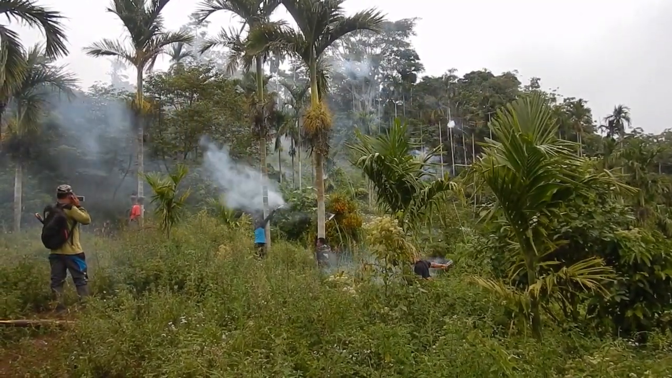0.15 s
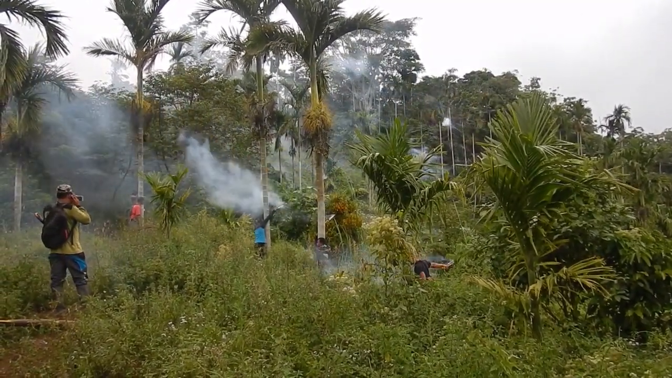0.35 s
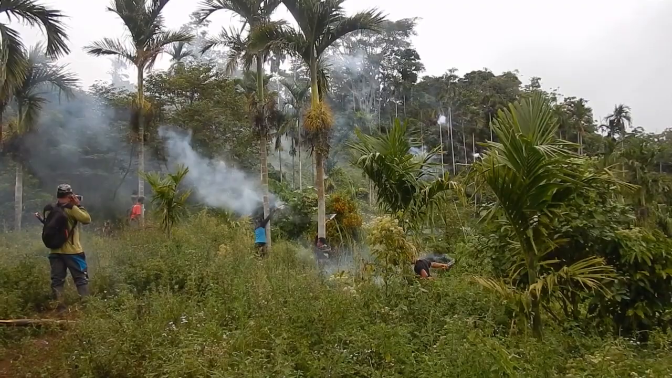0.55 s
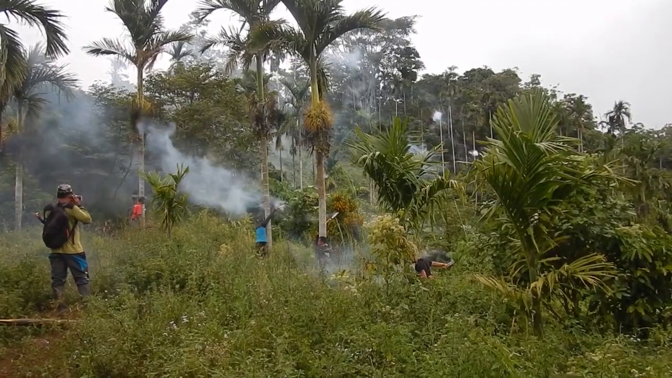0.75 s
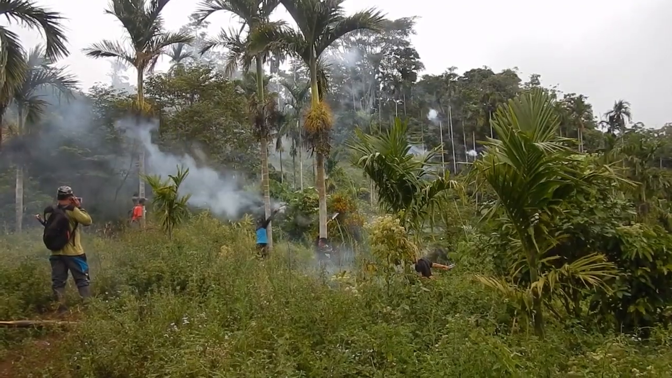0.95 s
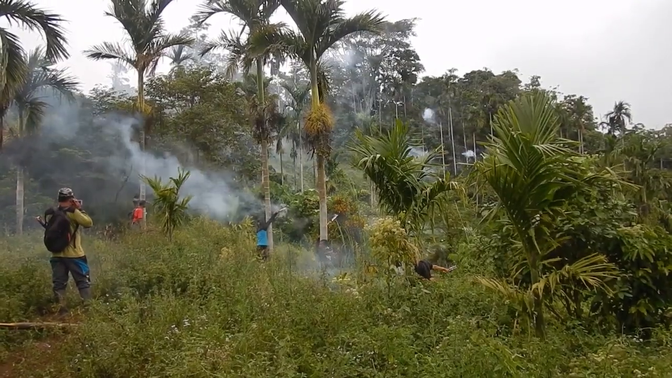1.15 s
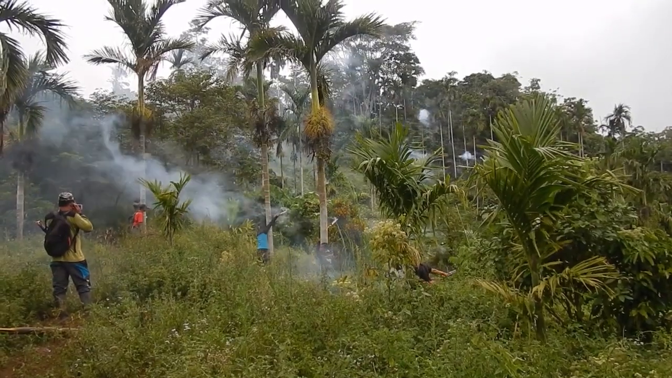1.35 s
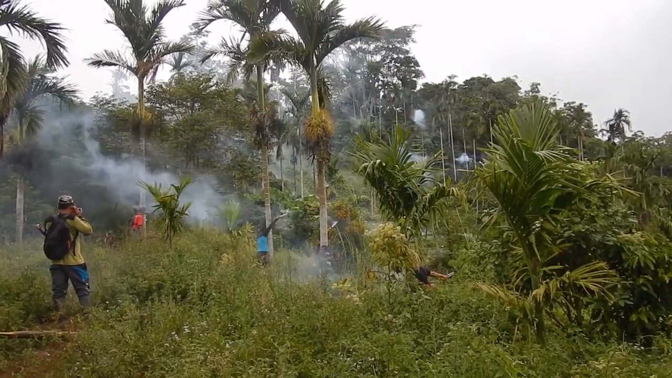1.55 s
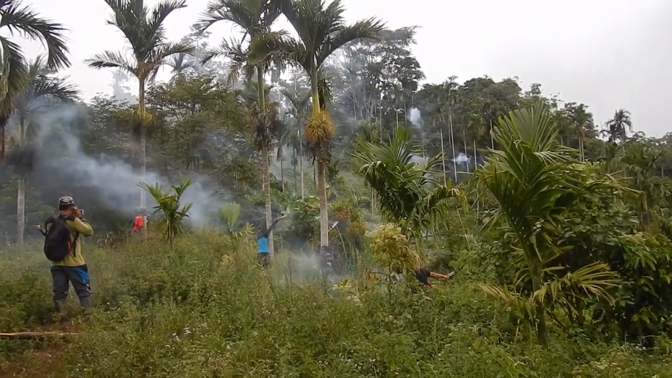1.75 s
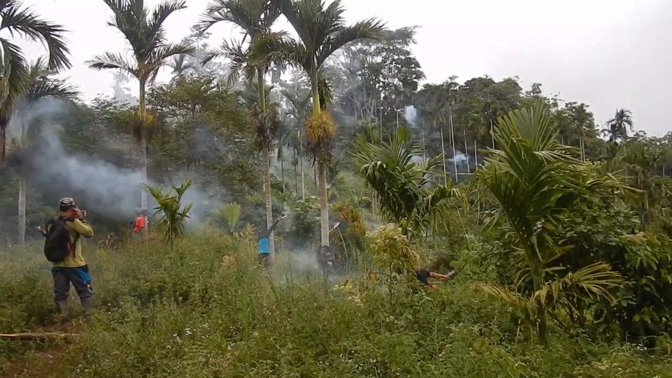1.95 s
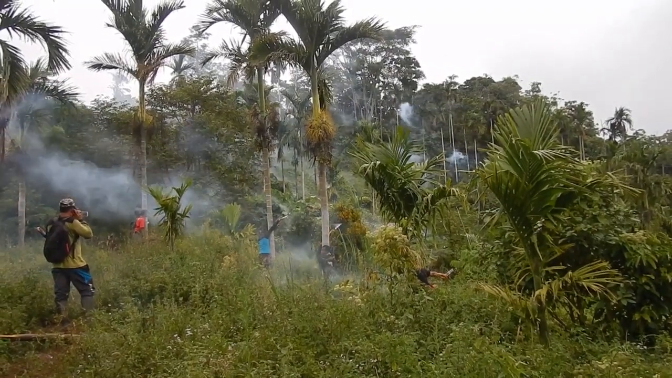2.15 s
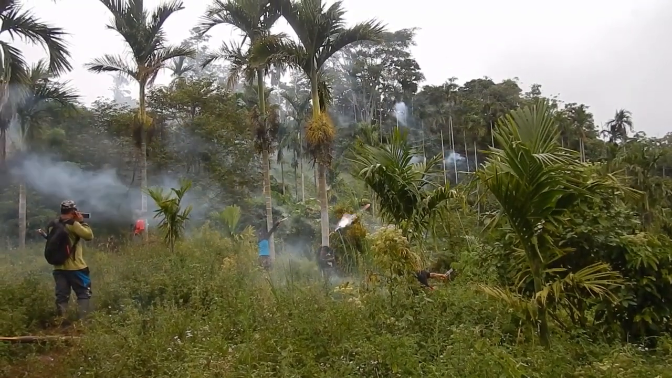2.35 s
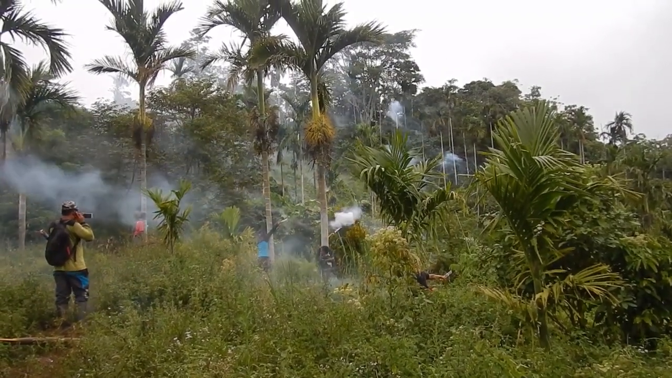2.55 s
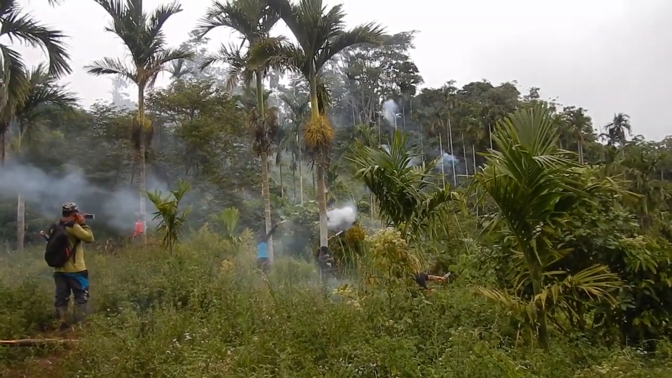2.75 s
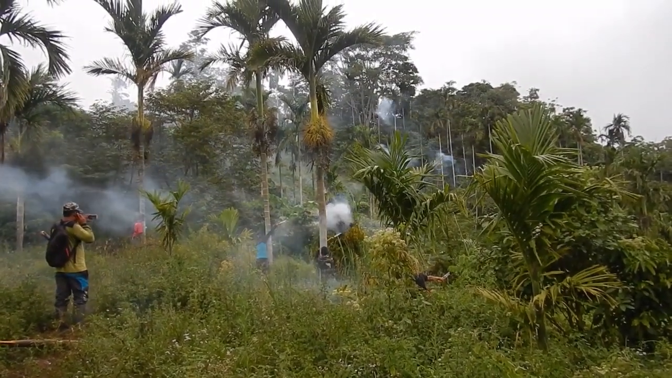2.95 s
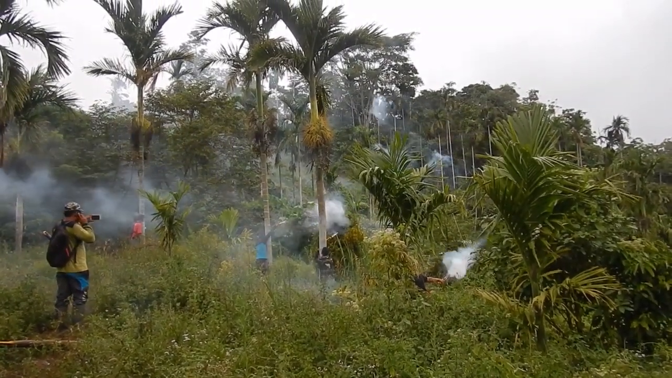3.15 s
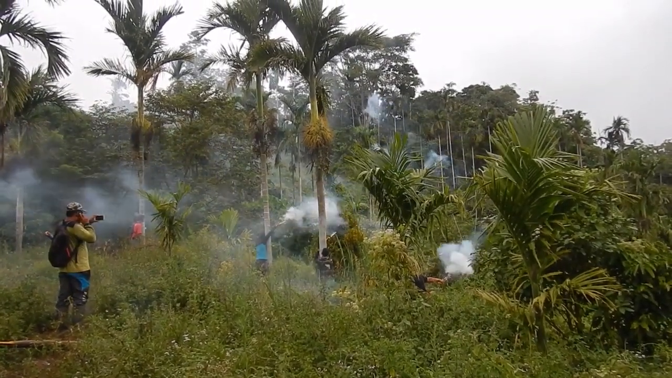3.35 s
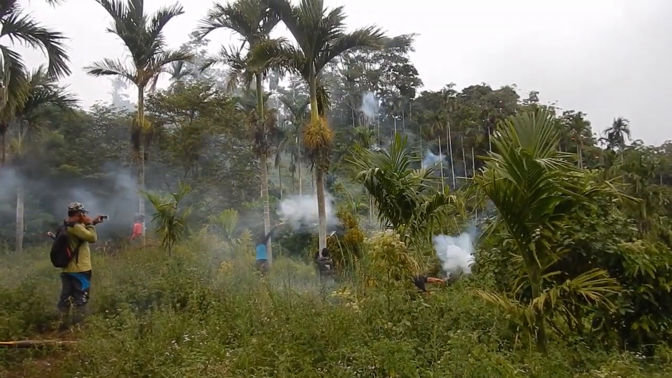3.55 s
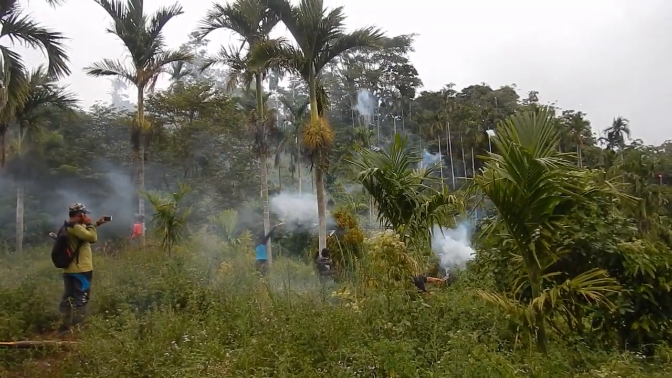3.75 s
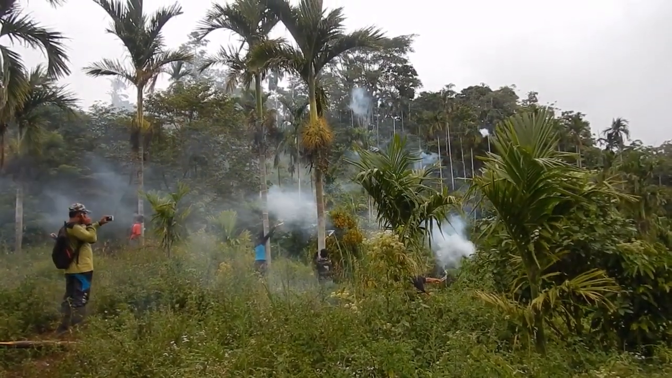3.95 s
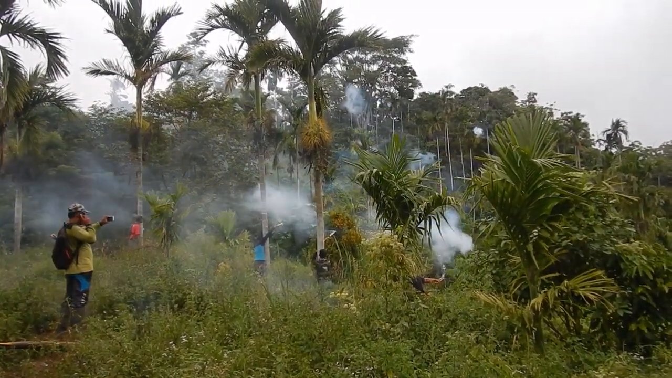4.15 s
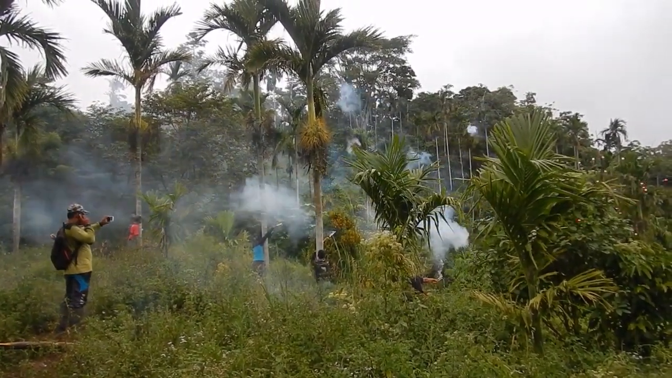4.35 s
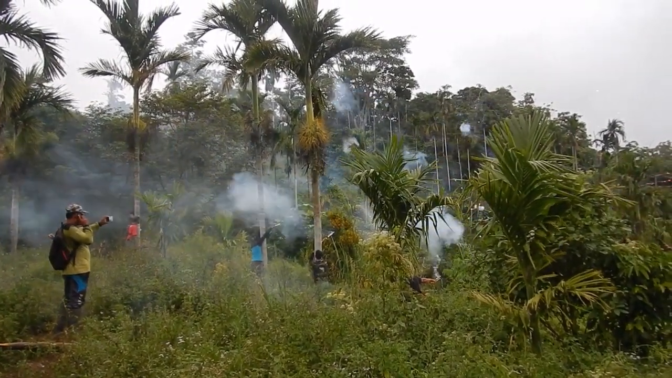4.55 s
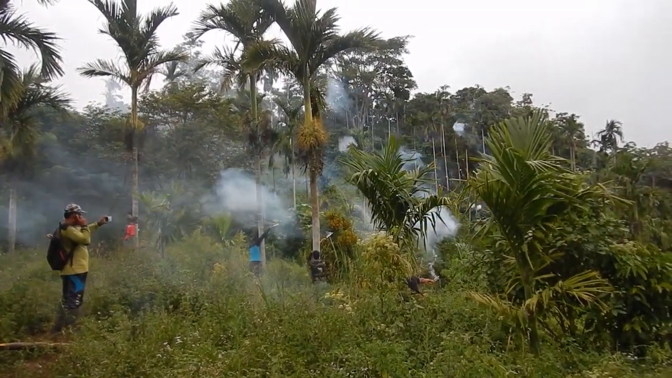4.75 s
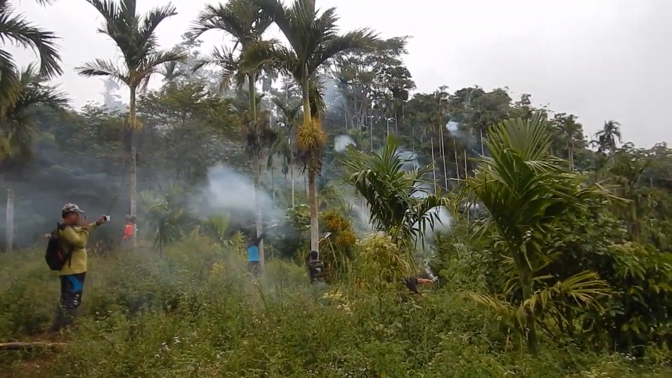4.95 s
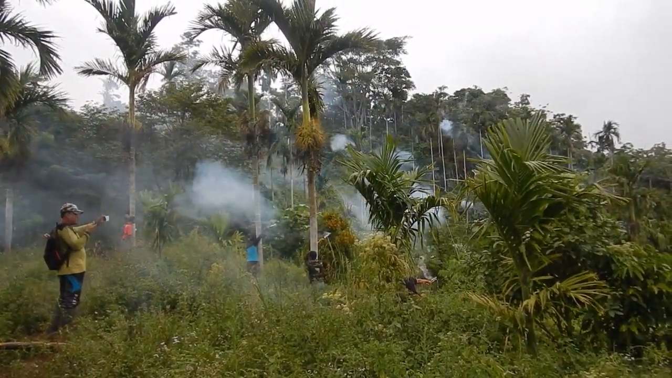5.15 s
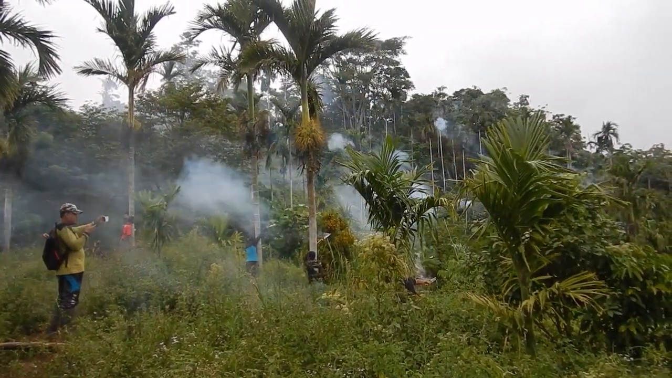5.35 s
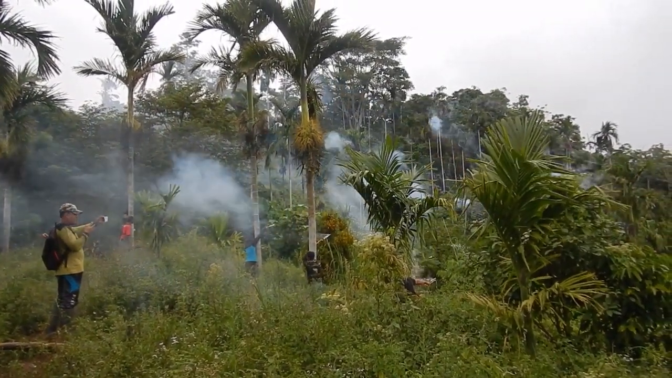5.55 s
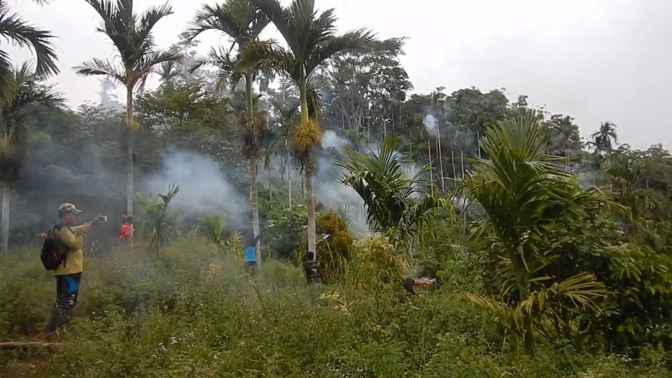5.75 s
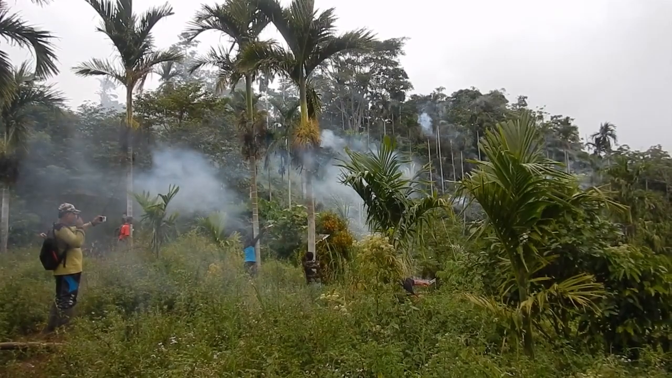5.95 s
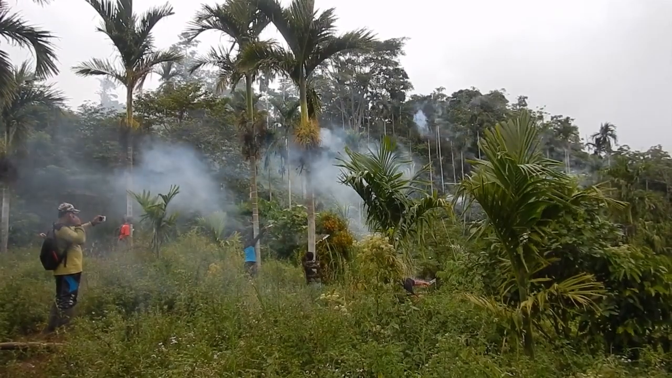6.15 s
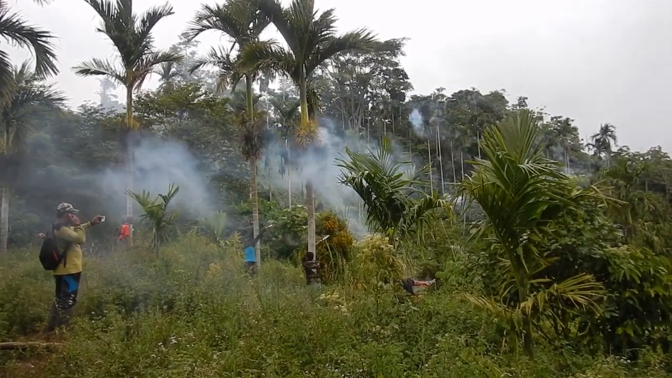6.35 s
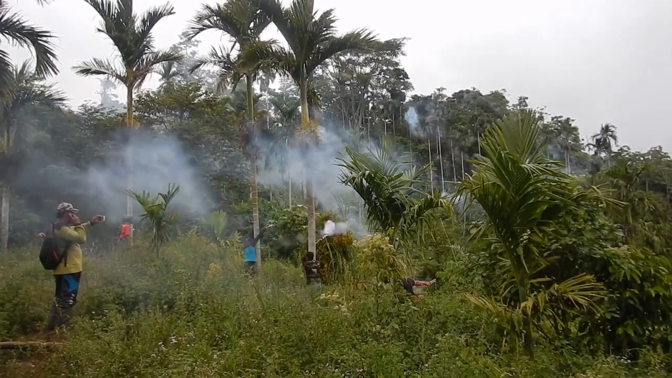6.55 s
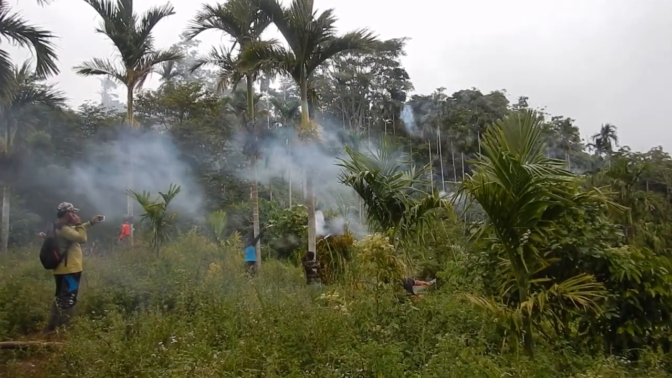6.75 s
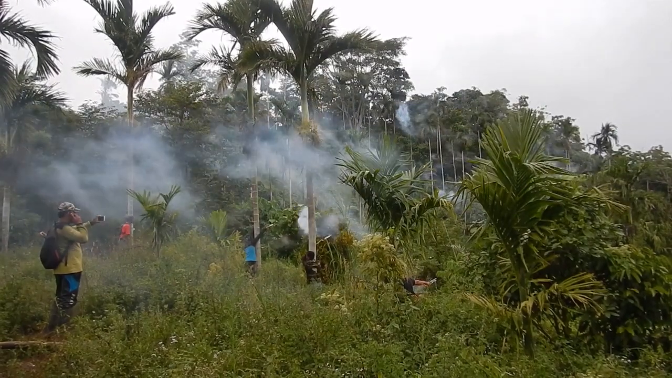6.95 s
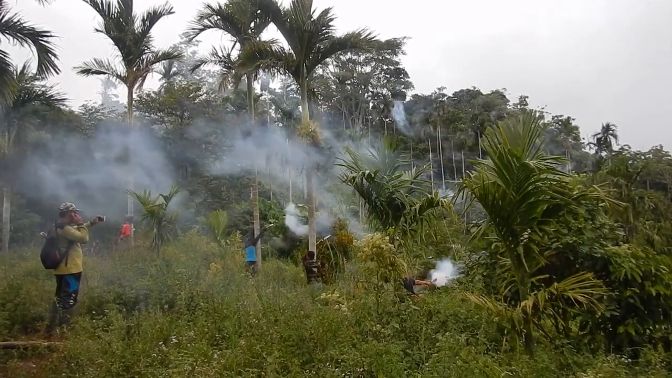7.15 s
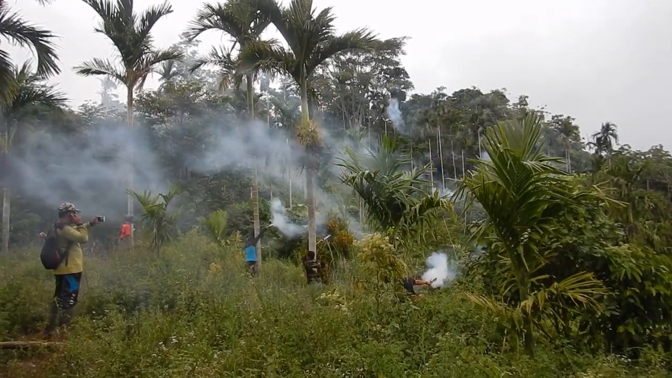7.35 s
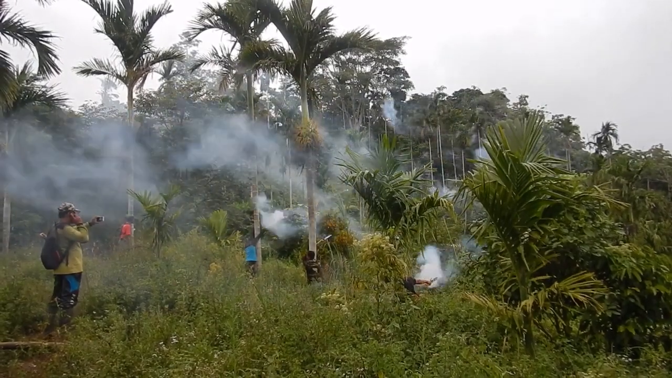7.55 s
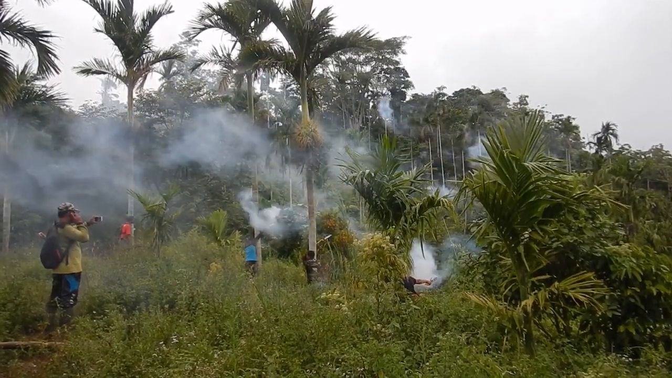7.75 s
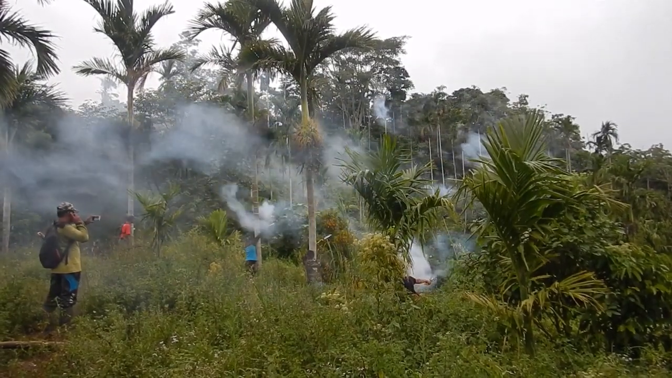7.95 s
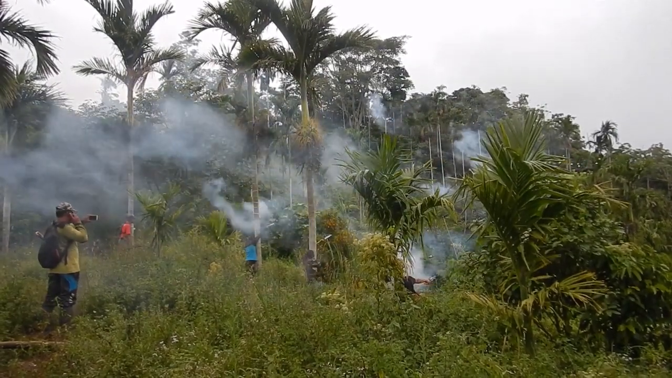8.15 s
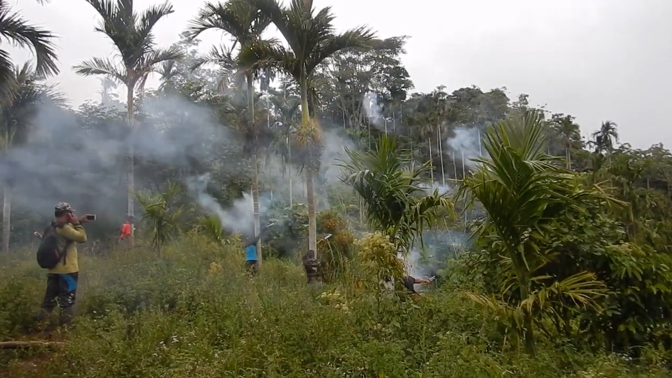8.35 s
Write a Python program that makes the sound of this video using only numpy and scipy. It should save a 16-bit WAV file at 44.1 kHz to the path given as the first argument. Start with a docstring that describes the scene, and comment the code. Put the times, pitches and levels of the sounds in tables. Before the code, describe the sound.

Echoing bang, second bang, a split-second dense crackle, then a pause. Sharp pops with snaps and short plant echoes come near three seconds, followed by three aerial bangs, two almost together. After a quiet gap, more pops and a final burst. Faint fuse hiss, soft wind gusts and distant hillside reverberation; open-air stereo microphone, punchy and slightly compressed.

```python
"""Small firework shells bang overhead, starting with one already ringing out, over a light wind with gusts.
One stretch is a rattle of crackling stars: very short blast waves, fizz and echo from a swarm of clicks.
Fuses hiss as shaped noise, then shells pop from tubes in the grass: a leak of gas, a blast wave and rings.
Most are followed by a burst about 1.2 to 1.6 s later. Fading noise forms the echoes of plants and wooded slopes.
Stray snaps surround the launches, and an insect, made of very narrow noise, trills once."""
import sys
import numpy as np
from scipy import signal
from scipy.io import wavfile

SR = 44100
rng = np.random.default_rng(int(sys.argv[2]) if len(sys.argv) > 2 else 0)


def wav_record(signal):
    """Record a signal, one row per channel, as 16-bit PCM in the file named by sys.argv[1]."""
    frames = np.transpose(np.atleast_2d(signal))
    bounded = np.clip(frames, -1, 1)
    # unit amplitude maps onto the largest positive 16-bit level
    quanta = np.round(bounded * 32767).astype(np.int16)
    wavfile.write(sys.argv[1], SR, quanta)


N = 374850   # length in samples

# Source levels are set before any later filtering and before the microphone.
# Shells bursting overhead. Each row: start in seconds, blast level in dB, blast pitch in Hz,
# ground bounce delay in ms, ring pitch in Hz, ring level in dB, crack level in dB,
# low cut in Hz, hillside echo level in dB.
BURSTS = [(-0.1, 7.5, 400, 1.8, 800, -9, -21, 22, -25.5), (0.7833, 7, 405, 1.82, 910, -10, -19.5, 25, -27),
          (3.6523, 5, 355, 2.3, 1720, -14.5, -13.5, 22, -26.5),
          (4.461, 5.5, 420, 1.6, 600, -5.5, -13, 24, -28.5),
          (4.6628, 7.5, 548, 1.52, 620, -6, -13.5, 160, -30.5),
          (8.1516, 7.5, 382, 1.66, 690, -9, -22.5, 14, -28)]
# Shells leaving their tubes. Each row: start in seconds, blast level in dB, blast pitch in Hz,
# tube boom level in dB, ring pitch in Hz, ring level in dB, crack level in dB, spark spray level in dB.
LAUNCHES = [(2.4711, -1.5, 258, -16, 2240, -13.5, -7, -29), (3.122, -3.5, 320, -18, 1770, -10.5, -6, -31.5),
            (3.3379, -16, 275, -21, 1610, -8.5, -8.5, -34.5), (6.5968, -6, 198, -15, 2250, -3.5, -5, -26),
            (7.1474, 0.5, 296, -18.5, 1120, -9, -18, -39), (7.5295, -18, 180, -33, 1880, -5, -14, -32.5)]
# Loud crackling stars. Each row: start in seconds, click level in dB.
STARS = [(1.2892, -19.5), (1.3523, -17), (1.3715, -11), (1.3888, -9), (1.3963, -4.5), (1.4145, -10),
         (1.4402, -6), (1.4445, -9.5), (1.4495, -5.5), (1.4692, -8), (1.5280, -12), (1.5433, -8),
         (1.5490, -9.5), (1.5755, -8), (1.6175, -14)]
# Stray snaps around the launches. Each row: start in seconds, click level in dB.
SNAPS = [(2.4828, -11), (3.1194, -1.5), (3.1380, -22), (6.6030, -9.5), (7.1633, -14), (7.4310, -39)]
# Gusts of wind. Each row: time of the crest in seconds, rumble level in dB.
GUSTS = [(2.3, -66), (6.301, -63.5)]

# Tone colors of the noises: hillside echo, echo from nearby plants, gas and sparks, stars and their echo,
# outdoor murk, wind rumble, fuse hiss, far slope. Each row: pitch in Hz, relative level in dB per Hz.
HILL_ECHO_COLOR = [(30, -41.5), (70, -31), (150, -10.5), (280, -9.5), (450, -1), (650, 1), (900, -2.5),
                   (1300, -5), (2000, -5), (3000, -11.5), (5400, -15), (9000, -19.5)]
PLANT_ECHO_COLOR = [(30, -16), (70, -11.5), (170, 8.5), (300, 1.5), (550, 7.5), (900, 3), (2000, 4),
                    (3000, -0.5), (5400, -45), (9000, -16)]
SPRAY_COLOR = [(100, -12), (600, -13.5), (2000, 0.5), (3000, 0.5), (5400, -2), (7000, -3), (9000, -10.5)]
STAR_COLOR = [(30, -39), (140, -5.5), (300, -17.5), (600, -1.5), (900, -3), (2000, 2), (3000, 0.5),
              (5400, -3.5), (7000, -2.5), (9000, -14)]
AIR_COLOR = [(30, -27.5), (150, -4.5), (320, -0.5), (650, 5), (900, -0.5), (1300, -4.5), (2000, -9),
             (3000, -12.5), (5400, -27), (7000, -36.5), (10000, -51.5)]
RUMBLE_COLOR = [(20, -5), (50, -6), (140, 2.5), (300, -6.5), (600, -12.5), (2000, -52)]
FUSE_COLOR = [(200, -8), (800, -2), (2000, -1), (3500, -6), (5400, -2), (7000, -6), (9000, -20)]
FAR_ECHO_COLOR = [(100, -6), (600, -0.5), (1200, 2), (2300, 1.5), (5400, -4.5), (9000, -16.5)]
# How echoes die away on the hillside, nearby, around the stars and on the far slope.
# Each row: pitch in Hz, time to drop by 60 dB in seconds.
HILL_T60 = [(100, 0.63), (300, 1.35), (600, 1.67), (1300, 1.234), (5400, 1.13), (9000, 0.86)]
NEAR_T60 = [(100, 0.18), (600, 0.64), (2000, 0.4), (6000, 0.39)]
STAR_T60 = [(100, .6), (600, 0.71), (2000, 0.86), (6000, 0.87)]
FAR_T60 = [(200, 2.3), (600, 1.7), (2000, 1.1), (5000, 1.1)]
# How alike noise is on the left and right. Each row: pitch in Hz, likeness from 0 to 1.
LIKENESS = [(25, 0.45), (70, 0.69), (200, 0.89), (600, 0.97), (1800, 0.91), (3000, .9), (5500, 0.93),
            (8000, 0.78), (12000, 0.23)]
# The boom of a tube. Each row: pitch in Hz, level in dB added to the boom level of the launch.
TUBE_MODES = [(630, -2), (1080, -0.5)]
# Bands shaped by the microphone cavity. Each row: pitch in Hz, width in Hz, lift (or dip) in dB.
PORT_MODES = [(3793, 1700, -8), (5482, 457, 17)]
# Narrow gaps in the recorder's response. Each row: pitch in Hz, width in Hz.
NOTCHES = [(2500, 260), (5000, 19), (6000, 40), (7000, 120)]

# the far slope answers every pop and bang
FAR_DELAY_S, FAR_LAUNCH_DB, FAR_BURST_DB = .26, -35, -36
# murk, rumble between gusts, and time from a gust's crest to 1/e of it
AIR_DB, BREEZE_DB, GUST_S = -60, -70.5, .35
# the swarm of smaller stars catches at once, then thins out and weakens
SWARM_START_S, SWARM_LENGTH_S, SWARM_RISE_S, SWARM_THINNING_S = 1.358, .29, .015, .2
SWARM_START_PER_S, SWARM_START_DB, SWARM_FADE_DB_PER_S, SWARM_SPREAD_DB = 1300, -20.5, 23, 4.3
STAR_FIZZ_S = .0016
# every fuse burns this long before its launch; one more catches at LAST_FUSE_S and burns on
FUSE_S, FUSE_RISE_S, FUSE_DB, LAST_FUSE_S = .7, .3, -74, 6.3
# gas escaping before a 0 dB blast; the second number is dB per dB of blast
LEAK_DB, LEAK_FOLLOWS, LEAK_RISE_S = -19.5, .65, 0.0038
# echo from nearby plants after a 0 dB blast; the second number is dB per dB of blast
THUD_DB, THUD_FOLLOWS = -30, 0.79
# the sharp ring of a launch has one overtone: pitch ratio and added level
RING_OVERTONE, RING_OVERTONE_DB = 1.6, -9
TUBE_GROUND_MS = 1.222   # delay of a pop's bounce off the ground
TRILL_START_S, TRILL_LENGTH_S, TRILL_RISE_S, TRILL_DB = 5.88, .45, .07, -93
INSECT_HZ, INSECT_WIDTH_HZ = 5525, 20
OVERLOAD, CUTOFF_HZ = 1.15, 16400   # ceiling that rounds the peaks (1 = full scale); top of the sound


def from_db(db):
    """Turn decibels into a gain."""
    return 10 ** (np.asarray(db) / 20)


def at_hz(points, hz):
    """Read a table between its rows, with pitch on a log scale."""
    f, value = np.transpose(points)
    return np.interp(np.log(hz + 1), np.log(f), value)


def cut(x, hz, kind, order=1):
    """Remove the treble ("low" pass) or the bass ("high" pass) with a Butterworth filter."""
    sos = signal.butter(order, min(hz, SR / 2 - 1), kind, fs=SR, output="sos")
    return signal.sosfilt(sos, x)


def bell(x, hz, width_hz, db):
    """Lift or lower one band."""
    band = signal.lfilter(*signal.iirpeak(hz, hz / width_hz, fs=SR), x)
    return x + (from_db(db) - 1) * band


def add(out, s, sound):
    """Mix a sound in from time s on."""
    at = round(s * SR)
    first, last = max(at, 0), min(at + sound.shape[-1], N)
    if last > first:
        out[..., first:last] += sound[..., first - at:last - at]


def swell(start_s, length_s, rise_s, fall_s):
    """Rise, hold and fall between 0 and 1."""
    t = np.arange(N) / SR - start_s
    return np.clip(np.minimum(t / rise_s, (length_s - t) / fall_s), 0, 1)


def noise(spectrum, length, t60=None, size=1024):
    """Stereo noise that starts at rms 1; given a t60 table, each frequency dies at its own pace."""
    white = rng.standard_normal((2, length))
    hz, t, (mid, side) = signal.stft(white, SR, nperseg=size)
    alike = np.clip(at_hz(LIKENESS, hz), 0, 1)[:, None]
    gain = from_db(at_hz(spectrum, hz))[:, None]
    gain = gain / np.sqrt(1 + (hz[:, None] / spectrum[-1][0]) ** 20)   # falls steeply above the last row
    gain = gain / np.sqrt(2 * np.mean(gain ** 2))
    if t60:
        gain = gain * np.exp(-np.log(1000) * t / at_hz(t60, hz)[:, None])
    mid = mid * np.sqrt(1 + alike)
    side = side * np.sqrt(1 - alike)
    stereo = gain * np.array([mid + side, mid - side])
    return signal.istft(stereo, SR, nperseg=size)[1][:, :length]


def scatter(spectrum, t60, rise_s, lumpy_db):
    """Echoes from countless trunks and leaves: they swell, arrive in clumps and die away."""
    t = np.arange(int(SR * np.max(np.array(t60)[:, 1]))) / SR
    clumps = 0
    for gap_s in (.002, .014):   # fine and coarse clumps
        clumps = clumps + np.interp(t / gap_s, np.arange(2000), rng.standard_normal(2000))
    return noise(spectrum, len(t), t60) * (1 - np.exp(-t / rise_s)) * from_db(lumpy_db * clumps)


def shock(t, hz):
    """A blast wave: a jump in pressure, then a longer suction."""
    phase = 2 * np.pi * hz * t
    return (1 - phase) * np.exp(-phase)


def report(blast_db, blast_hz, ground_ms, rings, crack_db, low_hz, front_hz,
           ground_share, ground_hz, ring_s, crack_s):
    """Blast wave and brief rings (Hz, dB), their dull bounce off the ground, and the crack of tearing paper."""
    t = np.arange(SR // 20) / SR
    ring = sum(from_db(db) * np.sin(2 * np.pi * hz * t) for hz, db in rings) * np.exp(-t / ring_s)
    blast = from_db(blast_db) * cut(shock(t, blast_hz), front_hz, "low")
    wave = cut(blast + ring, low_hz, "high", order=2)
    dull = cut(wave, ground_hz, "low")
    bounce = ground_share * np.interp(t - ground_ms / 1000, t, dull, left=0)
    paper = noise([(500, 0.39), (6000, 0.36), (16000, 0.79)], len(t))   # nearly flat: Hz, dB per Hz
    crack = from_db(crack_db) * paper * np.exp(-t / crack_s)
    return crack - wave - bounce   # the pressure jump points downward in the waveform


def far_slope(sound):
    """A late, lumpy echo: the sound is smeared by slope noise scaled to unit energy per side on average."""
    slope = scatter(FAR_ECHO_COLOR, FAR_T60, rise_s=0.074, lumpy_db=2.0)
    return signal.fftconvolve(sound, slope / np.sqrt(np.sum(slope ** 2) / 2), axes=1)


def bursts():
    """A burst high in the air sends out a blast wave and fills the whole hillside with echoes."""
    out = np.zeros((2, N))
    for s, blast_db, blast_hz, ground_ms, ring_hz, ring_db, crack_db, low_hz, echo_db in BURSTS:
        bang = report(blast_db, blast_hz, ground_ms, [(ring_hz, ring_db)], crack_db, low_hz, front_hz=1400,
                      ground_share=0.58, ground_hz=1200, ring_s=0.00096, crack_s=0.002)
        hillside = scatter(HILL_ECHO_COLOR, HILL_T60, rise_s=0.0011, lumpy_db=1.14)
        add(out, s, bang)
        add(out, s, from_db(echo_db) * hillside)
        add(out, s + FAR_DELAY_S, from_db(FAR_BURST_DB) * far_slope(bang))
    return out


def background():
    """Distant outdoor murk is steady noise; a light wind is low noise that swells in a few soft gusts."""
    t = np.arange(N) / SR
    gusts = sum(from_db(db) * np.exp(-((t - s) / GUST_S) ** 2) for s, db in GUSTS)
    wind = from_db(BREEZE_DB) + gusts
    return from_db(AIR_DB) * noise(AIR_COLOR, N) + wind * noise(RUMBLE_COLOR, N)


def clicks(rows):
    """One single-sample click for each row of (s, dB)."""
    out = np.zeros(N)
    for s, db in rows:
        add(out, s, from_db([db]))
    return out


def tiny_blasts(train, blast_hz, front_hz, fizz_db, fizz_s):
    """Every click becomes a very short blast wave and a brief spit of burning grit."""
    wave = cut(shock(np.arange(SR // 200) / SR, blast_hz), front_hz, "low", order=4)
    blasts = cut(signal.oaconvolve(train, wave / wave.max())[:N], 250, "high")
    # each click's power dies away; overlapping powers add up
    power = signal.lfilter([1], [1, -np.exp(-2 / (fizz_s * SR))], train ** 2 + 1e-18)
    burning = np.sqrt(power)
    return from_db(fizz_db) * burning * noise(STAR_COLOR, N) - blasts


def crackling_stars():
    """A few loud stars among a swarm of random small ones, all blasting, fizzing and echoing from the slope."""
    age = np.clip(np.arange(N) / SR - SWARM_START_S, 0, SWARM_LENGTH_S)
    active = swell(SWARM_START_S, SWARM_LENGTH_S, SWARM_RISE_S, SWARM_RISE_S)
    per_s = SWARM_START_PER_S * active * np.exp(-age / SWARM_THINNING_S)
    size_db = SWARM_START_DB - SWARM_FADE_DB_PER_S * age + SWARM_SPREAD_DB * rng.standard_normal(N)
    swarm = (rng.random(N) < per_s / SR) * from_db(size_db)
    train = clicks(STARS) + swarm
    slope = scatter(STAR_COLOR, STAR_T60, rise_s=.03, lumpy_db=1.5)
    random_signs = rng.choice([-1, 1], N)   # so that close echoes do not pile up
    echo = signal.oaconvolve(train[None] * random_signs, slope, axes=1)[:, :N]
    stars = tiny_blasts(train, blast_hz=1270, front_hz=5660, fizz_db=-9.0, fizz_s=STAR_FIZZ_S)
    return stars + from_db(-26.5) * echo


def fuses():
    """Each fuse is noise that catches, hisses steadily and stops as its shell leaves."""
    burning = sum(swell(s - FUSE_S, FUSE_S, FUSE_RISE_S, fall_s=.01) for s, *_ in LAUNCHES)
    burning = burning + np.clip((np.arange(N) / SR - LAST_FUSE_S) / FUSE_RISE_S, 0, 1)
    return from_db(FUSE_DB) * np.sqrt(burning) * noise(FUSE_COLOR, N)   # powers of the fuses add up


def launches():
    """Gas leaks past the shell, the tube pops, sparks spray; nearby plants and then the far slope answer."""
    out, t = np.zeros((2, N)), np.arange(SR // 20) / SR
    for s, blast_db, blast_hz, boom_db, ring_hz, ring_db, crack_db, spray_db in LAUNCHES:
        rings = [(hz, boom_db + db) for hz, db in TUBE_MODES]
        rings += [(ring_hz, ring_db), (ring_hz * RING_OVERTONE, ring_db + RING_OVERTONE_DB)]
        leak = noise(SPRAY_COLOR, len(t)) * np.exp((t - t[-1]) / LEAK_RISE_S)   # grows until the pop
        pop = report(blast_db, blast_hz, TUBE_GROUND_MS, rings, crack_db, low_hz=85, front_hz=1470,
                     ground_share=0.7, ground_hz=834, ring_s=0.0013, crack_s=.0013)
        plants = scatter(PLANT_ECHO_COLOR, NEAR_T60, rise_s=0.001, lumpy_db=1.5)
        sparks = scatter(SPRAY_COLOR, NEAR_T60, rise_s=0.00088, lumpy_db=1.5)
        add(out, s - t[-1], from_db(LEAK_DB + LEAK_FOLLOWS * blast_db) * leak)
        add(out, s, pop)
        add(out, s, from_db(THUD_DB + THUD_FOLLOWS * blast_db) * plants)
        add(out, s, from_db(spray_db) * sparks)
        add(out, s + FAR_DELAY_S, from_db(FAR_LAUNCH_DB) * far_slope(pop))
    return out


def stray_snaps():
    """Single snaps, each a tiny blast wave with a brief fizz."""
    return tiny_blasts(clicks(SNAPS), blast_hz=920, front_hz=4000, fizz_db=-10.0, fizz_s=0.0014)


def insect():
    """A thin, faint trill: noise so narrow that it sounds like a wavering tone."""
    edges = [INSECT_HZ - INSECT_WIDTH_HZ / 2, INSECT_HZ + INSECT_WIDTH_HZ / 2]
    band = signal.butter(2, edges, "band", fs=SR, output="sos")
    trill = signal.sosfilt(band, rng.standard_normal(N))
    loudness = swell(TRILL_START_S, TRILL_LENGTH_S, TRILL_RISE_S, TRILL_RISE_S)
    return from_db(TRILL_DB) * loudness * trill / trill.std()


def scene():
    """All sources added together at the microphone."""
    return bursts() + background() + crackling_stars() + fuses() + launches() + stray_snaps() + insect()


def record(dry):
    """Two close ports with a ringing cavity: left is one sample earlier, right is fuller; peaks are rounded."""
    x = cut(dry, 4750, "low", order=2)
    for hz, width_hz, db in PORT_MODES:
        x = bell(x, hz, width_hz, db)
    for hz, width_hz in NOTCHES:
        x = signal.lfilter(*signal.iirnotch(hz, hz / width_hz, fs=SR), x)
    left = from_db(-1.5) * bell(x[0], 2900, 1300, -1.6)
    one_sample_late = np.append(0, x[1, :-1])
    right = from_db(-0.37) * bell(one_sample_late, 3100, 1300, 2.8)
    rounded = OVERLOAD * np.tanh(np.array([left, right]) / OVERLOAD)
    steep_cut = signal.cheby2(14, 60, CUTOFF_HZ + 600, fs=SR, output="sos")   # 60 dB down from here up
    return signal.sosfilt(steep_cut, rounded)


dry = scene()
out = record(dry)
wav_record(out)
```